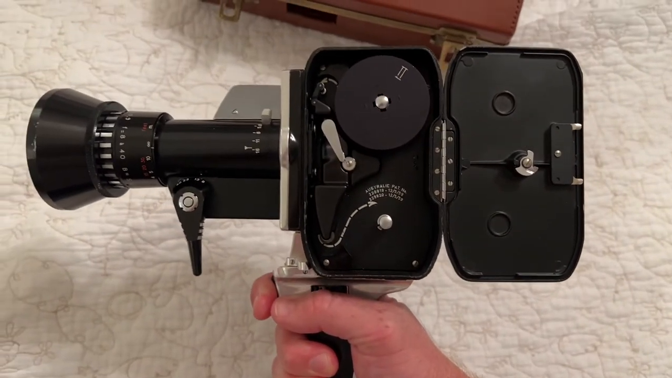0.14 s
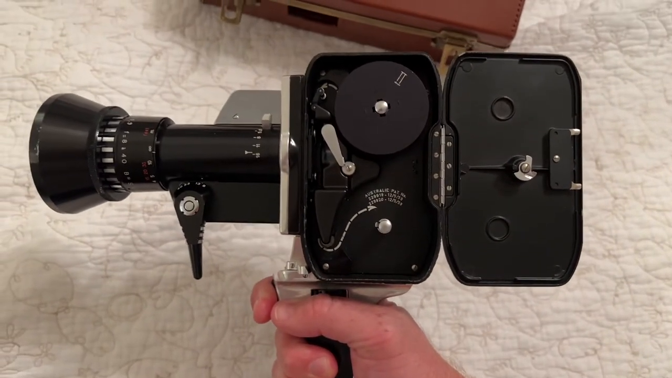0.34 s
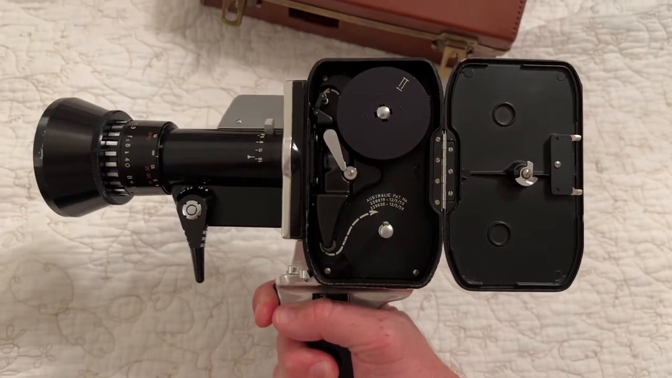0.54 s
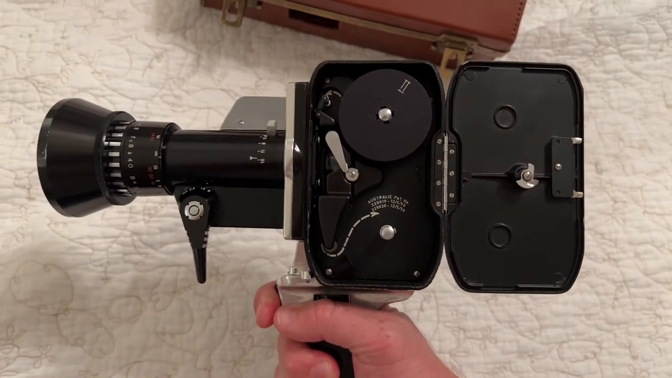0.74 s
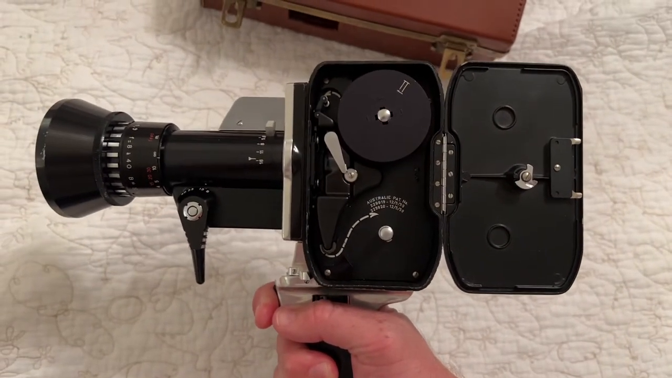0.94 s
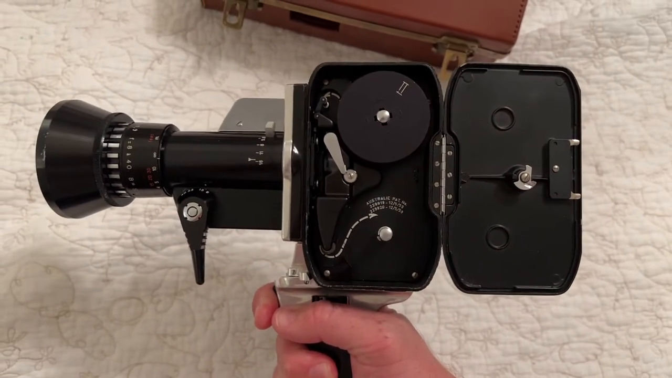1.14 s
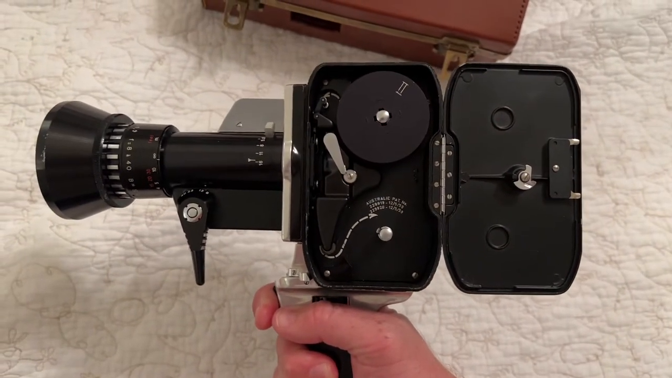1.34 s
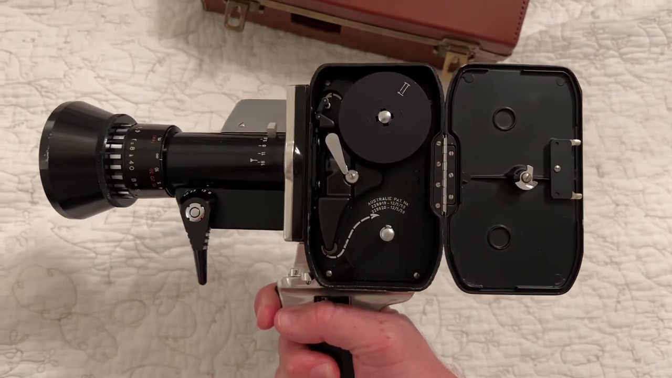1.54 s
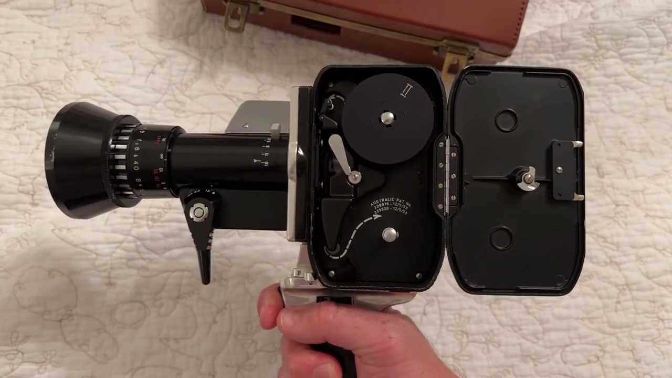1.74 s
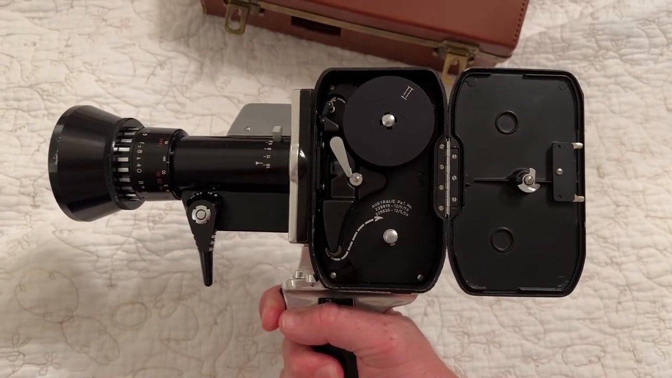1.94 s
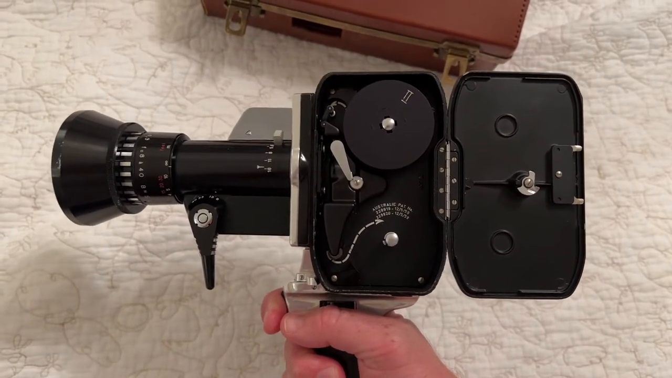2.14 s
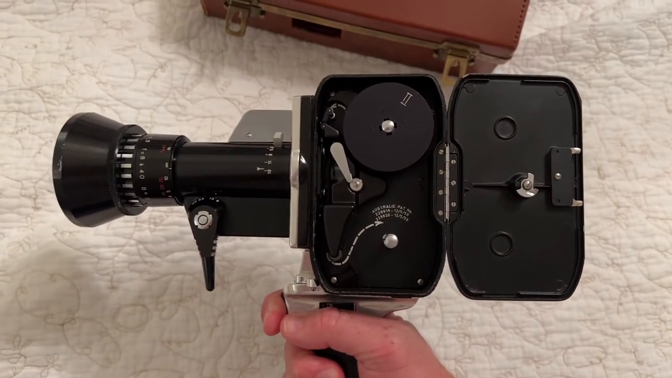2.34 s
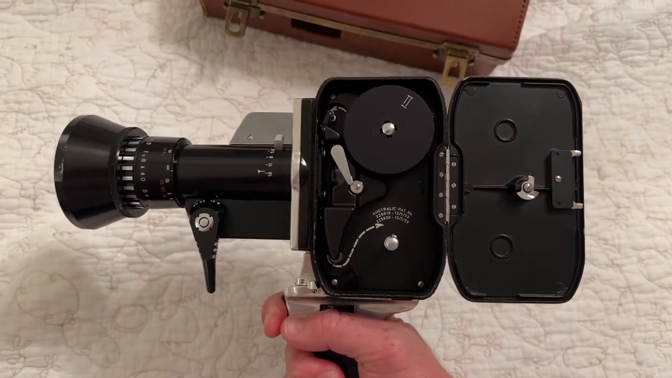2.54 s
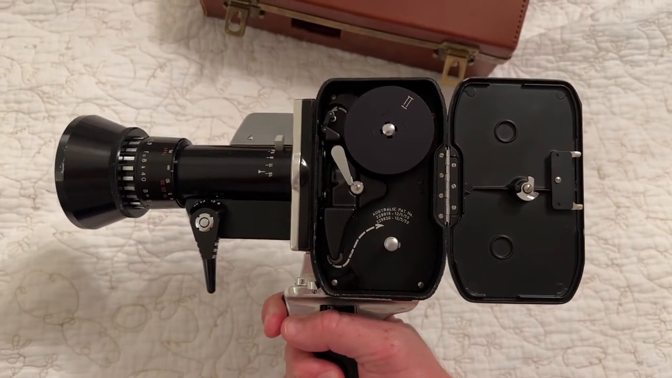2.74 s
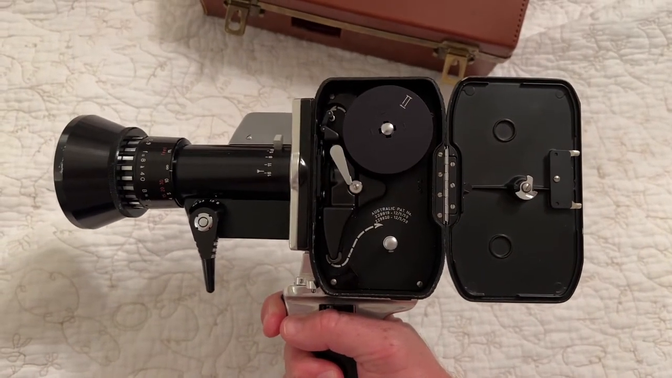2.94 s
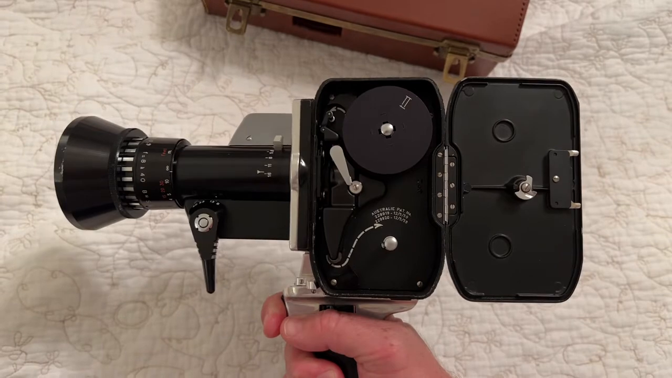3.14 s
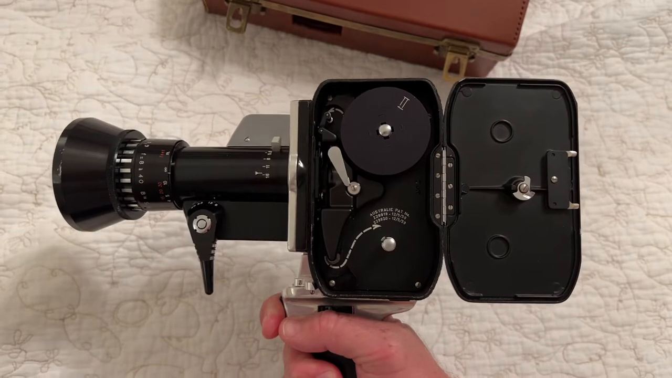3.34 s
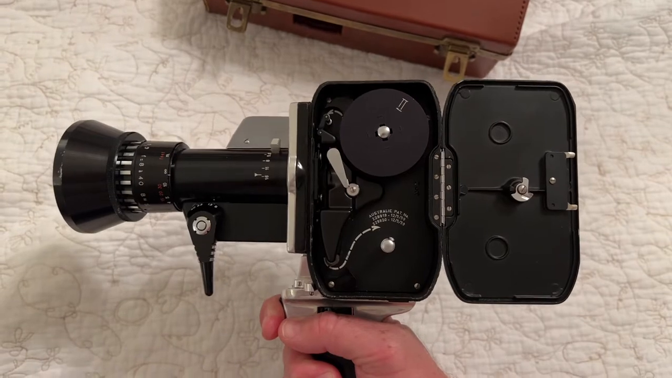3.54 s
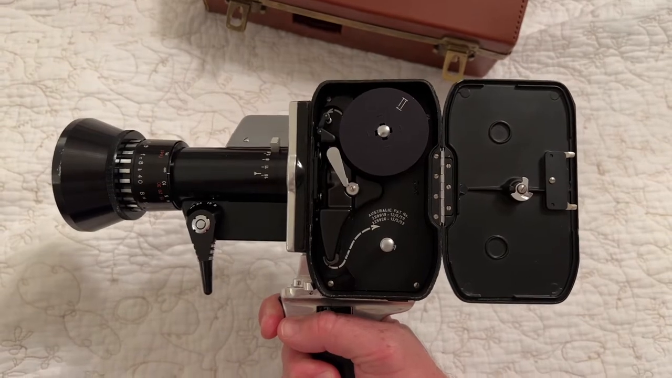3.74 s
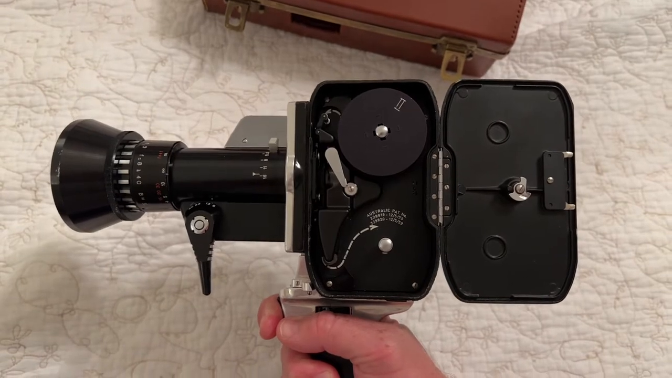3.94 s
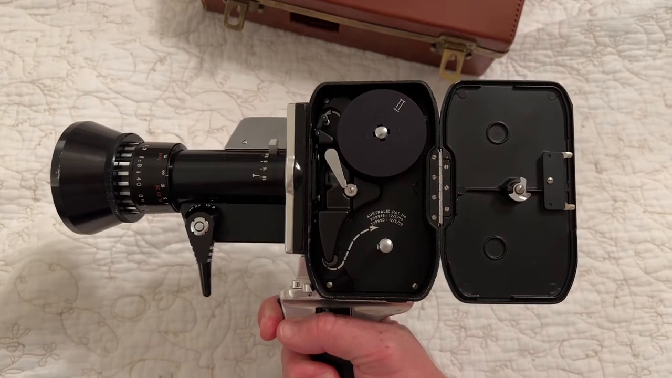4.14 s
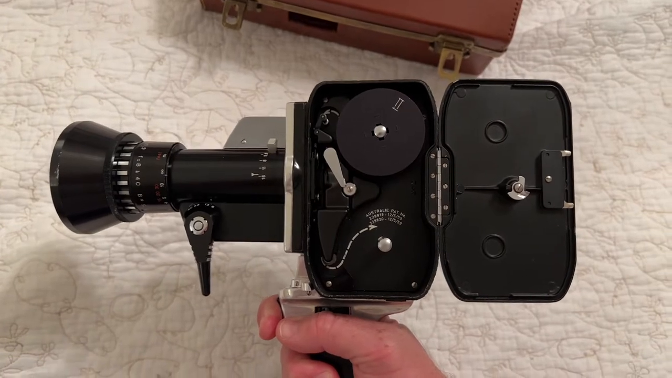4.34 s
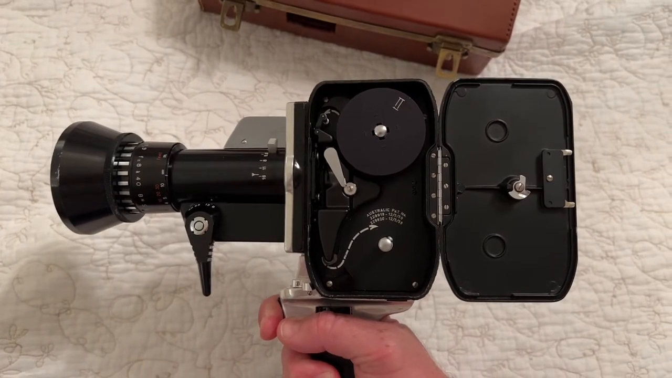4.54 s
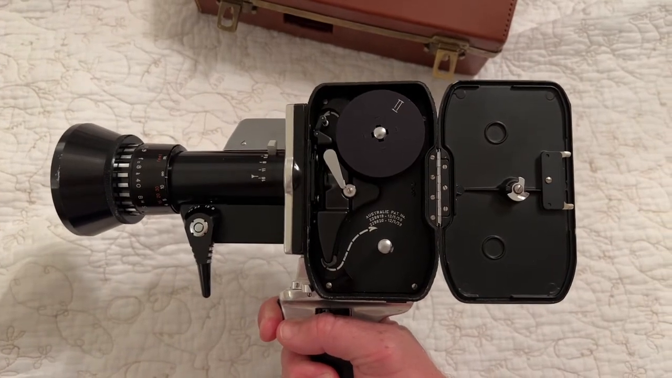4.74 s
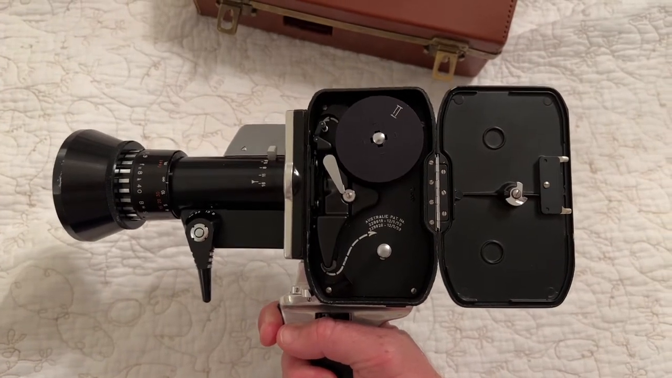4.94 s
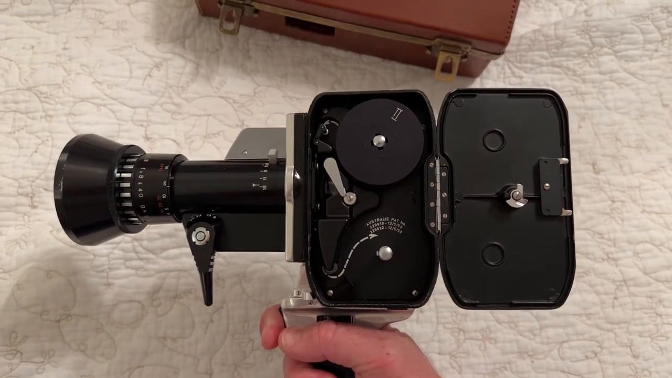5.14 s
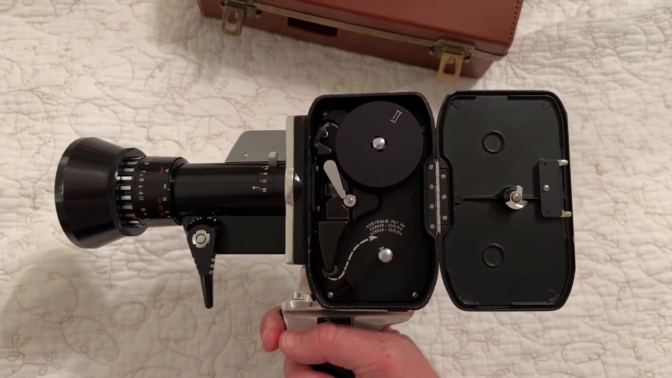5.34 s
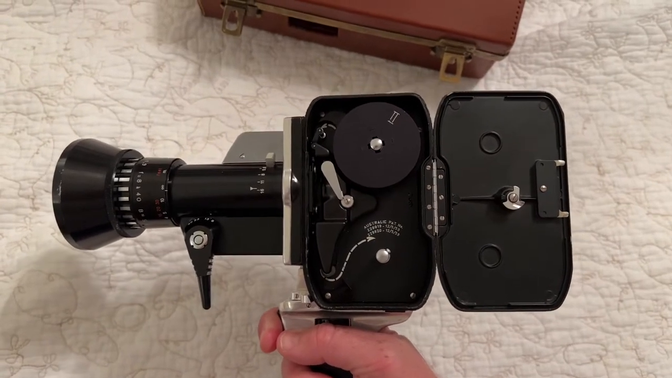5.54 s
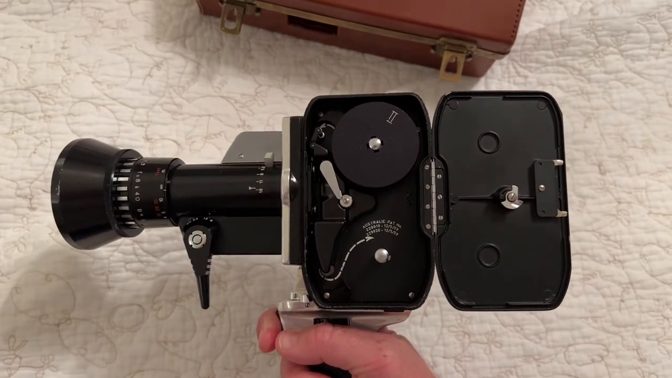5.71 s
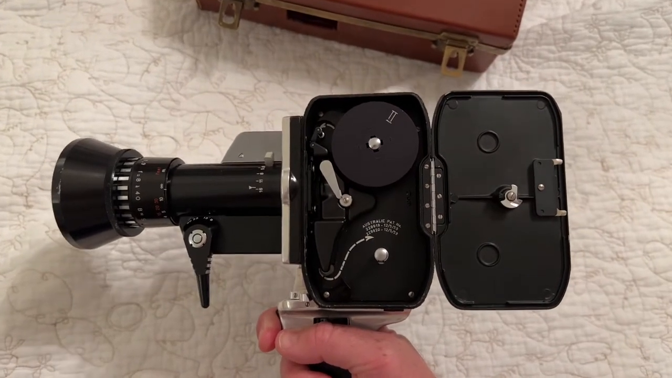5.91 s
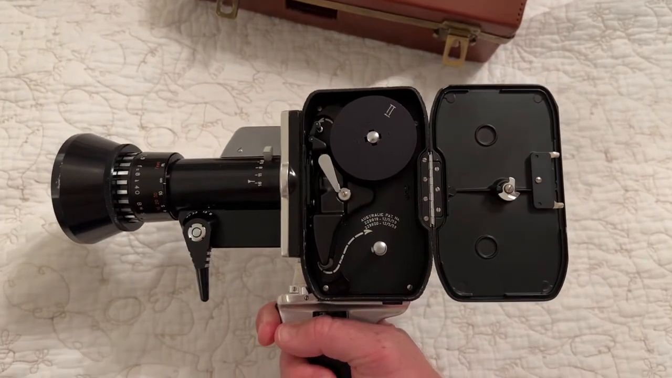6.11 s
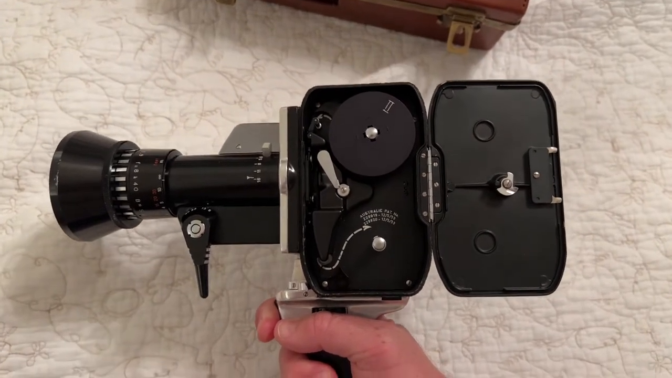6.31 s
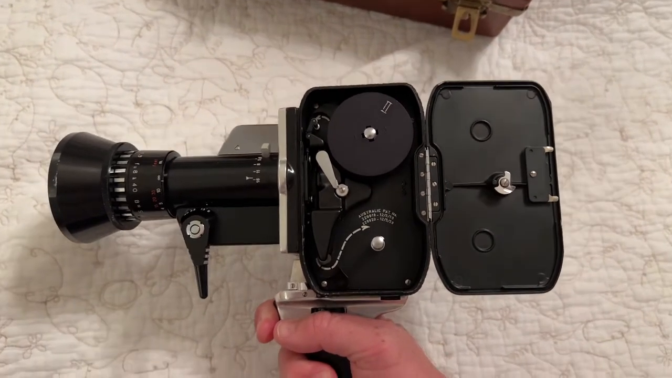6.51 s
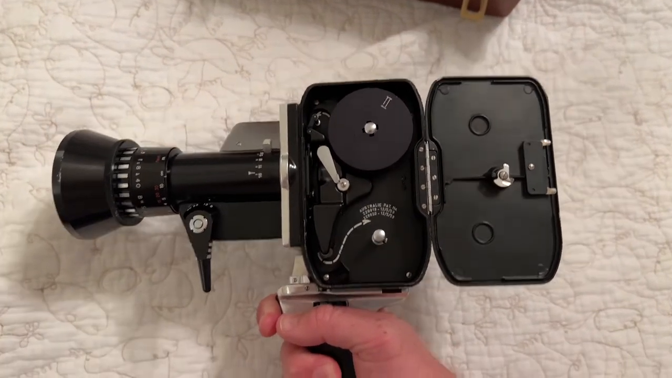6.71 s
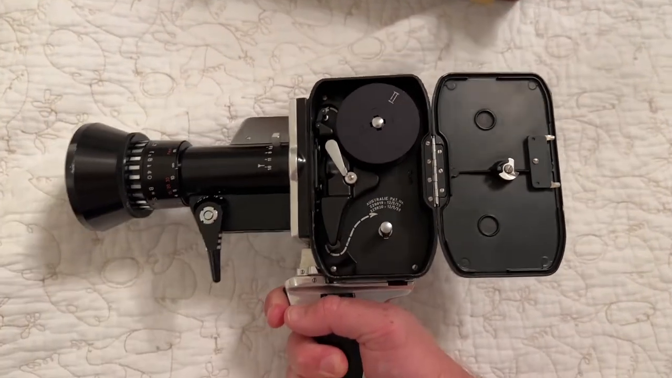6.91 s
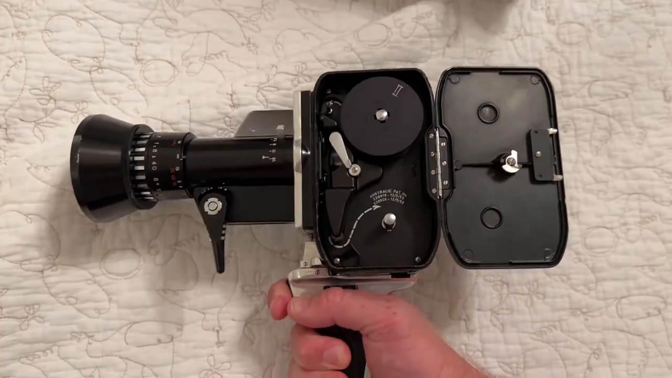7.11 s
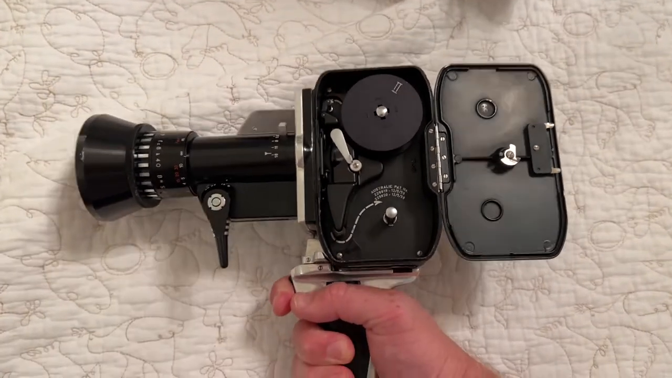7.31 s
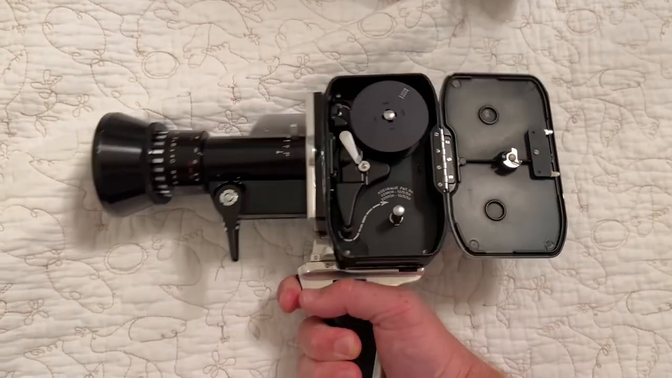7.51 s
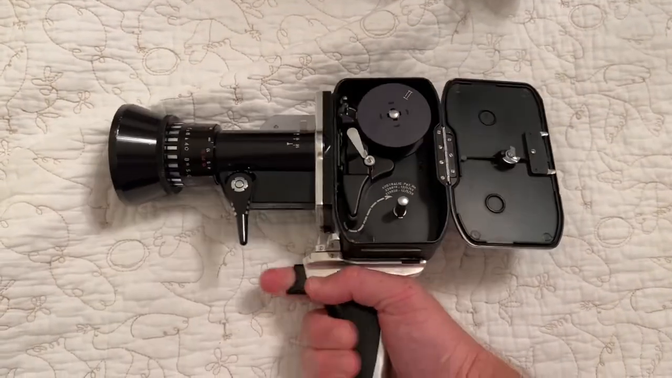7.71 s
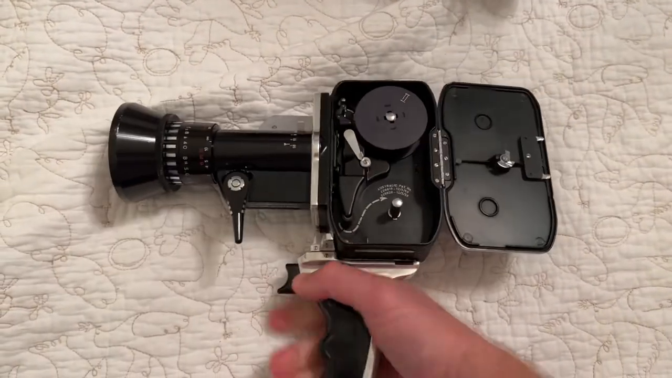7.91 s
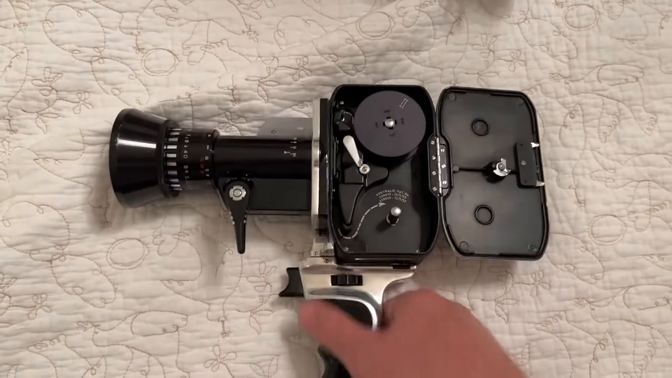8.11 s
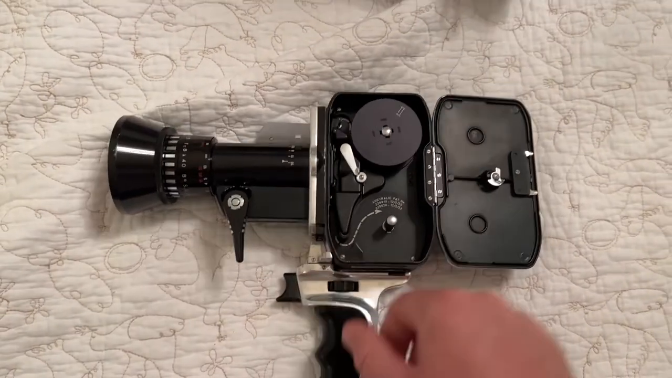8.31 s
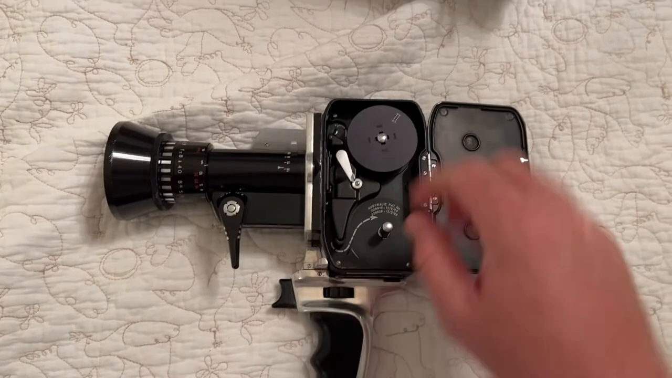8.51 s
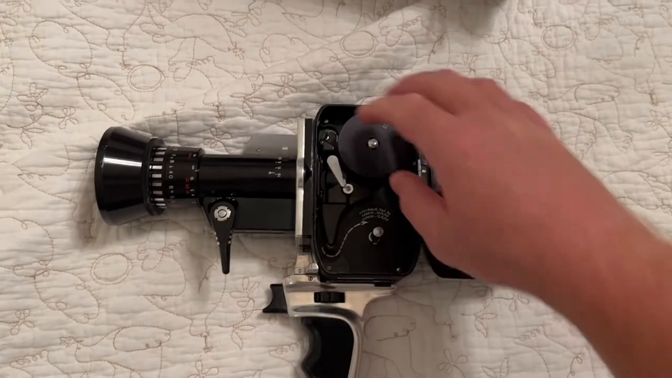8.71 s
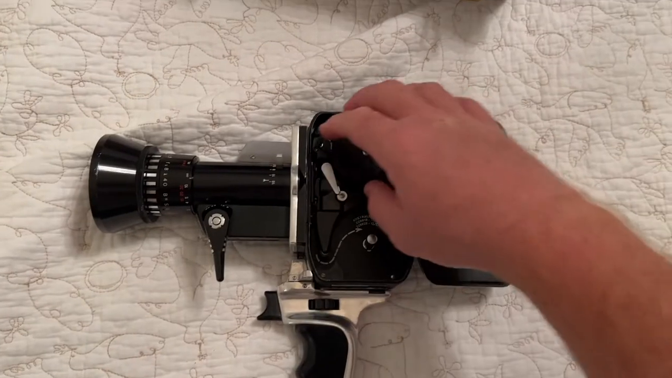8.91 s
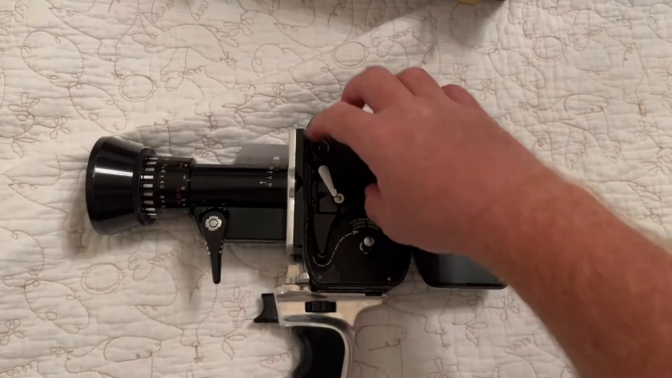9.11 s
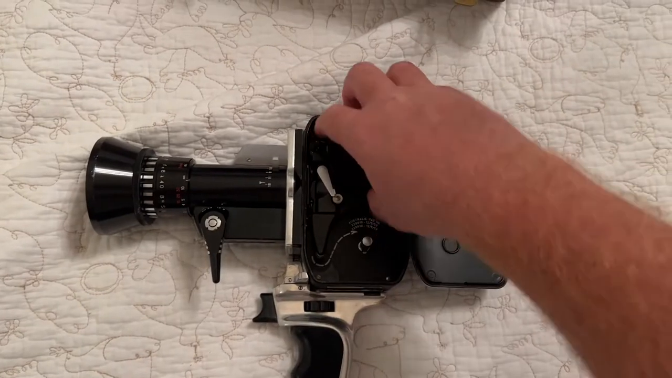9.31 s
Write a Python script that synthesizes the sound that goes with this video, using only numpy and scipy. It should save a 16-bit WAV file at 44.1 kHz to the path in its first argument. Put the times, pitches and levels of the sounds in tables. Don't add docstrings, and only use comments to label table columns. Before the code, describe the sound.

Close, fast mechanical whir of a clockwork film camera ends in a sharp clack; quiet handling, trigger clicks, cloth rub and spool rattle follow.

```python
import sys
import numpy as np
from scipy import signal
from scipy.fft import rfft, irfft
from scipy.io import wavfile
from scipy.ndimage import uniform_filter1d, map_coordinates

SR = 44100
rng = np.random.default_rng(int(sys.argv[2]) if len(sys.argv) > 2 else 0)


def inscribe(sig):
    pcm = np.round(np.clip(np.atleast_2d(sig).T, -1, 1) * 32767)
    wavfile.write(sys.argv[1], SR, pcm.astype(np.int16))


def volts(x):
    e = np.asarray(x, float) / 20
    return 10 ** e


N = 417186
T = np.arange(N) / SR
STOP_S, DRAG_S = 6.89, 9.1

# (frequency [Hz], level [dB per Hz])
BODY = [(220, -47.5), (380, -26), (569, -22), (687, -18), (1000, -4), (1180, -7.5), (1290, -2.5),
        (1890, -10.5), (2100, -8), (3960, -15.5), (5320, -23.5), (7160, -24), (9500, -33.5), (12400, -30),
        (20900, -120)]
# (frequency [Hz], width [Hz], level [dB])
PLATES = [(420, 12, -1), (904, 200, 1), (1031, 86, 3), (1110, 18, 4), (1295, 80, 5.5), (1498, 104, 3.5),
          (1875, 150, 8.5), (2125, 90, -10.5), (3114, 200, 4.5), (4003, 164, 8.5), (4610, 160, 8.5),
          (4986, 64, 11), (5700, 270, 4), (7140, 150, 2), (7570, 160, 7)]


def noise():
    return rng.standard_normal(N)


def tone(turns):
    return np.sin(2 * np.pi * turns)


def wave(turns):
    return np.cos(2 * np.pi * turns)


def rms_one(x):
    return x / np.sqrt(np.mean(x ** 2) + 1e-20)


def in_time(rows):
    s, *columns = np.transpose(rows)
    return [np.interp(T, s, column) for column in columns]


def between(start_s, end_s, fade_s=.006):
    fade_in = np.clip((T - start_s) / fade_s + 1, 0, 1)
    return fade_in * np.clip((end_s - T) / fade_s + 1, 0, 1)


def drift(rate_hz):
    points = rng.standard_normal(int(N / SR * 60) + 2)
    return np.interp(T * rate_hz, np.arange(len(points)), points) * np.sqrt(1.5)


def split(x, hz):
    return [signal.sosfilt(signal.butter(2, hz, side, fs=SR, output="sos"), x) for side in ("low", "high")]


def colour(x, spectrum, bumps=()):
    size = 2 ** 14
    hz = np.arange(size // 2 + 1) * SR / size + 1
    curve_hz, curve_db = np.transpose(spectrum)
    db = np.interp(np.log(hz), np.log(curve_hz), curve_db)
    db = db + sum(top_db / (1 + (2 * (hz - f) / width) ** 2) for f, width, top_db in bumps)
    cepstrum = irfft(np.log(volts(db)))
    cepstrum[1:size // 2] *= 2
    cepstrum[size // 2 + 1:] = 0
    impulse = irfft(np.exp(rfft(cepstrum)))
    return rms_one(signal.oaconvolve(x, impulse)[:N])


def resonances(x, modes):
    out = 0
    for k, (hz, width_hz, db) in enumerate(modes):
        r = np.exp(-np.pi * width_hz / SR)
        poles = [1, -2 * r * np.cos(2 * np.pi * hz / SR), r * r]
        out = out + (-1) ** k * volts(db) * signal.lfilter([1 - r, 0, r - 1], poles, x)
    return rms_one(out)


def air():
    # (frequency [Hz], level [dB per Hz])
    air_spectrum = [(12, -31), (20, -15.5), (44, -2), (116, -8.5), (138, -17.5), (168, -9), (204, -16.5),
                    (285, -12), (319, -17), (472, -24), (558, -31.5), (1610, -25.5), (6360, -33.5),
                    (9950, -41.5), (16000, -47)]
    hum = resonances(noise(), [(110, 9, 0)])
    return volts(-68) * colour(noise(), air_spectrum) + volts(-74.5) * hum


def bedroom(x):
    low_t60_s, high_t60_s, room_db = .4, .32, -24
    t = np.arange(int(.4 * SR)) / SR
    dull = split(rng.standard_normal(len(t)), 9400)[0]
    low, high = split(dull, 2500)
    tail = (low * volts(-60 * t / low_t60_s) + high * volts(-60 * t / high_t60_s)) * (t > .006)
    return volts(room_db) * signal.oaconvolve(x, tail / np.sqrt(np.sum(tail ** 2)))[:N]


def gear_rub(turns, low_db, high_db):
    count, stage = 2400, T / .3
    flaws = rng.standard_normal((24, count))
    place, blend = turns % 1 * (count - 1), np.pi / 2 * (stage % 1)
    older, newer = [map_coordinates(flaws, [stage // 1 + k, place], order=1) for k in (0, 1)]
    repeat = split(np.cos(blend) * older + np.sin(blend) * newer, 1400)[0]

    idler_turns = 2.7 * turns
    load_db = wave(12 * turns) + .49 * wave(11 * turns) + .85 * np.cos(2 * np.pi * turns + 1.4)
    load_db = load_db + .7 * wave(idler_turns) + .6 * drift(25)
    mixed = colour(volts(load_db) * noise(), BODY, PLATES) + .5 * colour(repeat, BODY, PLATES)
    low = signal.sosfiltfilt(signal.butter(4, 1180, fs=SR, output="sos"), mixed)
    return volts(low_db) * low + volts(high_db) * (mixed - low)


def wheel_tones(turns, loose, tilt):
    # (multiple of shaft [1], level [dB], change with tilt [dB])
    wheels = [(27, -77, 2), (50, -67, 2), (51, -66, 0), (54, -60, -4), (55.6, -64, 0), (60, -57, -3),
              (65, -60, 9), (77, -57, -4), (67, -59, 2), (68, -63, 2), (75, -58, -3), (78.25, -59, -4),
              (90.6, -63, 0), (109, -62, 0)]
    looser = 12 * loose - 11 * turns
    out = np.zeros(N)
    for k, db, by_db in wheels:
        level_db = db - 2 + by_db * tilt + 3.2 * drift(2.93)
        out += volts(level_db) * np.sin(2 * np.pi * k * looser + k ** 2)
    return out


def plates_facing(x, sway, tilt):
    # (frequency [Hz], width [Hz], sway [dB], change with tilt [dB])
    facing = [(1000, 82, 2.5, -1), (1060, 120, 1.5, 3), (1300, 130, 2, -2), (2120, 150, 2, 6),
              (2470, 570, 1, 0.5), (4030, 250, 2, -0.5), (4930, 150, 3.5, 1), (7100, 300, 3, 1)]
    for k, (hz, width_hz, sway_db, by_db) in enumerate(facing):
        gain = volts(sway_db * np.roll(sway, k * SR) + by_db * tilt ** 2)
        x = x + (gain - 1) * signal.lfilter(*signal.iirpeak(hz, hz / width_hz, fs=SR), x)
    return x


def mesh_tone(loose):
    # (multiple of shaft [1], level [dB])
    mesh = [(27, -17), (30, -18), (31, -15), (32, -11), (33, -3), (34, 0), (35, -2.5), (36, -9), (37, -14)]
    return rms_one(sum(volts(db + drift(2.5)) * np.sin(2 * np.pi * k * loose + np.pi * min(k - 34, 0))
                       for k, db in mesh))


def tooth_ticks(turns, tilt, tick_db, high_db):
    # (frequency [Hz], width [Hz], level [dB])
    pinion = [(3650, 600, 1), (5860, 660, 2), (7110, 142, 7), (7800, 560, -4), (10930, 170, -11)]
    # (frequency [Hz], width [Hz], level [dB])
    shutter = [(11600, 500, -11), (12250, 800, -11), (13480, 520, 1.5), (14630, 900, -6)]
    shutter_db, claw_db, tap_db = -6.5, -83, -22.5

    at = np.flatnonzero(np.diff(np.floor(12 * turns)))
    chance = np.clip(rng.standard_normal((len(at), 2)), -2, 2)
    turn = turns[at]
    size_db = 2.2 * np.cos(4 * np.pi * turn + 1.2) + 1.7 * np.cos(2 * np.pi * turn + 2.1)
    size_db += 1.3 * wave(3 * turn) + wave(5.65 * turn)
    size_db += .7 * chance[:, 0] + 2.4 * uniform_filter1d(chance[::-1, 1], size=4)
    at = at + np.abs(6 * chance[:, 1]).astype(int)
    hits = np.zeros(N)
    hits[at] = volts(size_db)
    chatter = signal.lfilter([.09], [1, -1.88, .8835], hits)
    hits[at] *= volts(2.9 * chance[::-1, 0])
    flutter = signal.lfilter([1], [1, -.95], hits) + .1 * (1 + wave(23 * turns))

    rattle = noise()
    ticks = volts(tick_db) * resonances((chatter + .059) * rattle, pinion)
    ticks += volts(tick_db + shutter_db - 1.5 * tilt) * resonances((flutter + .04) * noise(), shutter)
    claw_swing_db = 12 * np.cos(2 * np.pi * turns + 3.5)
    ticks += volts(claw_db + claw_swing_db) * resonances(rattle[::-1], [(9800, 490, 0)])
    taps = split(colour(chatter * rattle, BODY, PLATES), 1420)[1]
    return ticks + volts(high_db + tap_db) * rms_one(taps)


def train():
    # (time [s], shaft speed [turns/s])
    speed = [(0.0, 16.953), (0.5, 16.938), (1.0, 16.911), (1.5, 16.88), (2.0, 16.855), (2.5, 16.836),
             (3.0, 16.821), (3.5, 16.807), (4.0, 16.787), (4.5, 16.752), (5.0, 16.698), (5.5, 16.624),
             (6.0, 16.535), (6.5, 16.446), (6.85, 16.4)]
    play_turns = .002
    turns = np.cumsum(in_time(speed)[0]) / SR + .024
    loose = turns + play_turns * drift(1.5)
    sway = (loose - turns) / play_turns
    tilt = np.interp(T, (5.16, 6.16), [0, 1])

    low_db, high_db = -44 + .3 * tilt, -45.5 - tilt
    tick_db, mesh_db = -57.5 + .7 * tilt, -64 - 4.5 * tilt
    barrel_s, slack_s, barrel_db = 2.91, .1, 2.5
    mesh_db = mesh_db - barrel_db * wave((T - slack_s) / barrel_s)

    rub = gear_rub(turns, low_db, high_db) + wheel_tones(turns, loose, tilt)
    rub = plates_facing(rub, sway, tilt)
    ticks = tooth_ticks(turns, tilt, tick_db, high_db)
    running = (rub + volts(mesh_db) * mesh_tone(loose)) * between(0, STOP_S)
    return running + ticks * between(0, STOP_S - .022)


def governor():
    whine_s, coast_s, end_s = 6.62, 6.9, 7.15
    coast_hz, whine_sag_hz_per_s, sag_hz_per_s, brake_hz_per_s3 = 14480, 1500, 4000, 250000
    whine_db, coast_db, fade_from_s, fade_db_per_s = -80, -83, 7.06, 150
    t = np.clip(T - coast_s, 0, end_s - coast_s)
    hz = coast_hz + whine_sag_hz_per_s * np.clip(coast_s - T, 0, 1)
    hz = hz - sag_hz_per_s * t - brake_hz_per_s3 * t ** 3
    db = np.where(t > 0, coast_db, whine_db) - fade_db_per_s * np.clip(T - fade_from_s, 0, 1)
    return volts(db + 3 * drift(60)) * tone(np.cumsum(hz) / SR) * between(whine_s, end_s)


def knock(peak_db, body_db, treble_db, body_hz, ring_hz, ring_db, contact_s):
    # (frequency [Hz], level [dB], t60 [s])
    thin_parts = [(2800, -4, .006), (3500, -4, .006), (4300, -3, .006), (5300, -18, .025), (6000, -4, .005),
                  (7300, -4, .004), (10400, -8, .004), (12200, -8, .008), (14500, -4, .003)]
    # (multiple of body pitch [1], level [dB], t60 [s])
    hollow_modes = [(.36, -30, .02), (.78, -13, .01), (1, 0, .017), (1.27, -6, .01), (1.5, -8, .008)]
    t = np.arange(3000) / SR
    u = t / contact_s
    push = u ** 2 * np.exp(-1.3 * u) + .17 * np.minimum(u / 2, 1) * np.exp(-t / .0036)
    force = rng.standard_normal(len(t)) * push

    struck = [(ring_hz, ring_db - 3, .003), (.9 * ring_hz, ring_db - 5, .003)]
    hz, db, t60_s = np.transpose(thin_parts + struck)[:, :, None]
    detune = 1 + .019 * rng.standard_normal(hz.shape)
    parts = volts(db - 60 * t / t60_s) * tone(hz * detune * t)
    rung = signal.fftconvolve(force, parts.sum(axis=0))[:len(t)] + volts(22) * force
    middle, treble = split(split(rung, 2200)[1], 7000)
    middle, treble = split(middle, 7000)[0], split(treble, 7000)[1]

    ratio, db, t60_s = np.transpose(hollow_modes)[:, :, None]
    hollow = volts(db - 60 * t / t60_s) * tone(body_hz * ratio * t)
    body = signal.fftconvolve(force, hollow.sum(axis=0))[:len(t)]
    body = split(split(body, .64 * body_hz)[1], .55 * body_hz)[1]

    middle, treble, body = [volts(peak_db) * x / np.abs(x).max() for x in (middle, treble, body)]
    return middle, volts(treble_db) * treble + volts(body_db) * body


def shade(x):
    shades = [
        (6.8, [(3200, 600, -2), (4500, 1200, 3), (7560, 1400, 6), (12000, 1200, 3.5), (15000, 3500, -10)]),
        (7.5, [(2200, 600, -2), (4600, 920, -5), (6330, 820, 2), (11200, 920, 3), (14800, 1500, 4)]),
        (8.9, [(450, 200, 14), (760, 330, -22), (1770, 170, -0.5), (2700, 650, -2.5), (4500, 770, 5), (7540, 2300, -6.5), (12400, 500, 7.5), (14300, 1500, 3)]),
    ]
    edges = [int(s * SR) for s, _ in shades] + [N]
    for (_, bands), start, end in zip(shades, edges, edges[1:]):
        for hz, width_hz, db in bands:
            r = np.exp(-np.pi * width_hz / SR)
            poles = [2, -4 * r * np.cos(2 * np.pi * hz / SR), 2 * r ** 2]
            band = signal.lfilter([1 - r ** 2, 0, r ** 2 - 1], poles, x[start:end])
            x[start:end] += (volts(db) - 1) * band
    return x


def knocks():
    # (time [s], peak [dB], body [dB], treble [dB], body pitch [Hz])
    camera_snaps = [(6.8668, -29.5, -12, 4, 1050), (6.8693, -33, -1, -4, 1060),
                    (6.874, -22.5, -7, -13, 1300), (6.875, -35, -6, -5, 1300), (6.881, -41, 9, -1, 1190),
                    (6.895, -41, -12, -6, 1750), (6.9035, -56, -10, -3, 1500),
                    (6.9608, -48.5, -8, -6, 1260), (6.9918, -55, 5, -20, 1700),
                    (7.0006, -50.5, -2, -6, 1830), (7.0121, -57, -2, -3, 1750), (7.56, -55, -11, -8, 1960),
                    (7.5936, -37.5, -26, -18, 2280), (7.5959, -31.5, -25, -8, 2250),
                    (7.605, -32.5, -14, -13, 1050), (7.6786, -53, -12, -6, 2190),
                    (7.687, -32, -13, -5, 1950), (7.7002, -61, -7, 4, 1550), (7.718, -34.5, -26, -2, 1900),
                    (7.7221, -34, -9, -11, 1450)]
    # (time [s], peak [dB], body [dB], body pitch [Hz], flange pitch [Hz])
    spool_snaps = [(9.061, -62, 6, 1450, 2990), (9.1153, -30, -2, 2060, 2840),
                   (9.1607, -16.5, -1.5, 1523, 4640), (9.1658, -35, 6.5, 1480, 3100),
                   (9.174, -35, -10, 1500, 2590), (9.218, -42.5, 1.5, 1240, 4280),
                   (9.242, -42.5, -9, 1600, 4300), (9.268, -47, 11.5, 1660, 4420),
                   (9.3208, -38.5, 1, 1510, 4430), (9.3424, -33.5, -9, 1380, 4020),
                   (9.383, -58, 19, 1500, 2780), (9.3904, -58, 18, 1530, 2830),
                   (9.4134, -32, -11, 1650, 4650), (9.4148, -30.5, -1.5, 1650, 3740)]
    # (time [s], peak [dB], body [dB], treble [dB], body pitch [Hz])
    nudges = [(6.8887, -44, 14, -15, 950), (7.62, -47, -4, -9, 1390), (7.6225, -52, 1, -5, 1310),
              (8.2347, -53, 5, -15, 1450), (8.2539, -64, 5, -14, 1270), (9.0535, -59.5, 1, -19, 1700),
              (9.1102, -53, 6, -17, 1500), (9.1579, -31, -3, -12, 1620), (9.222, -45, 7, 3, 1310),
              (9.2455, -47, 8.5, -7, 1500), (9.256, -56, 8, -15, 1500), (9.26, -56, 13, -15, 1300),
              (9.2705, -52, 9, -24, 1400), (9.324, -41, 6, -4, 1090), (9.3285, -54, 5, -8, 1150),
              (9.3385, -56, 14.5, -15, 1300), (9.346, -57, -1, -19, 1300), (9.387, -58, 6, -12, 1500),
              (9.411, -53, 17, -15, 1600), (9.4352, -56, 17, -15, 1250), (9.4427, -56, 14, -12, 1085),
              (9.451, -57, 10, -9, 1080), (9.457, -57, 11, -9, 1080)]
    pawl_hz, latch_hz, latch_s, rim_hz = 4700, 5600, 7.6, 4100
    part_db, flange_db, spool_treble_db = 2.5, 11.5, -6
    snap_s, nudge_s = .0005, .0011

    hits = [(*row, latch_hz if row[0] > latch_s else pawl_hz, part_db, snap_s) for row in camera_snaps]
    for s, db, body_db, hz, ring_hz in spool_snaps:
        treble_db = spool_treble_db - max(body_db, 0)
        hits.append((s, db, body_db, treble_db, hz, ring_hz, flange_db, snap_s))
    hits += [(*row, rim_hz, part_db, nudge_s) for row in nudges]

    out = np.zeros(N + 3000)
    for s, *settings in hits:
        middle, rest = knock(*settings)
        start = round(s * SR) - np.abs(middle).argmax()
        out[start:start + 3000] += middle + rest
    out += 1e-12 * rng.standard_normal(len(out))
    return shade(out)[:N]


def cloth():
    # (start [s], top [s], end [s], rub level [dB], thud re rub [dB])
    strokes = [
        (6.892, 6.9, 7.27, -74, 8),
        (7.47, 7.97, 8.24, -58.5, -10.5),
        (8.95, 9.09, 9.11, -82, 7),
    ]
    # (frequency [Hz], level [dB per Hz])
    cloth_spectrum = [(410, -41), (700, -10), (1290, -0.5), (3120, -1.5), (4080, -6.5), (4740, -8.5),
                      (7920, -21), (9000, -21), (11700, -59), (19800, -120)]
    rest_thud_db, rest_rub_db, rest_fine_db, fine_db = -78, -84.5, -87, -17
    rub, low_rub = np.zeros(N), np.zeros(N)
    for start_s, top_s, end_s, db, thud_db in strokes:
        rise_fall = np.interp(T, [start_s, top_s, end_s], [0, 1, 0])
        swell = volts(db) * rise_fall ** np.where(T > top_s, .72, 1)
        rub += swell
        low_rub += volts(thud_db) * swell
    thud = resonances(noise(), [(377, 260, 11.5), (750, 1400, -.5)])
    fine = rms_one(split(noise(), 7000)[1])
    out = (volts(rest_thud_db) + low_rub * volts(.68 * drift(20))) * thud
    out += (volts(rest_rub_db) + rub * volts(2.1 * drift(45))) * colour(noise(), cloth_spectrum)
    out += (volts(rest_fine_db) + volts(fine_db) * rub) * fine
    return out * between(STOP_S, DRAG_S)


def trigger():
    # (time [s], lever squeal [dB], spring squeal [dB])
    slide = [(6.9, -105, -105), (7.18, -105, -100), (7.22, -100, -87), (7.27, -92, -95), (7.32, -80, -90),
             (7.4, -88, -83), (7.47, -80, -77), (7.54, -74, -74), (7.59, -74, -80)]
    # (frequency [Hz], width [Hz], level [dB])
    lever = [(1850, 60, 0), (4200, 45, -1)]
    # (frequency [Hz], width [Hz], level [dB])
    spring = [(7550, 22, 0), (11650, 40, -12), (14450, 50, -24)]
    # (frequency [Hz], width [Hz], level [dB], loss [dB/s])
    stop_ring = [(1800, 110, -68, 75), (2800, 120, -75, 90), (3000, 2500, -61, 330), (4200, 45, -66, 190),
                 (7550, 30, -79, 110)]
    rough_db = -4
    lever_db, spring_db = in_time(slide)
    since_s = np.clip(T - slide[0][0], 0, 1)
    friction = volts(1.5 * drift(40)) * noise()
    out = np.zeros(N)
    for hz, width_hz, db, loss in stop_ring:
        out += volts(db - loss * since_s) * resonances(friction, [(hz, width_hz, 0)])
    for level_db, modes, rate_hz in ((lever_db, lever, 25), (spring_db, spring, 40)):
        pure = sum(volts(db) * tone(hz * T) for hz, _, db in modes)
        squeal = volts(rough_db) * resonances(friction, modes) + pure
        out += volts(level_db - 1 + 2.5 * drift(rate_hz)) * squeal
    return out * between(slide[0][0], slide[-1][0])


def after_rings():
    # (time [s], frequency [Hz], level [dB], t60 [s])
    rings = [(7.688, 5250, -58, .08), (7.72, 10600, -63, .08), (7.724, 1380, -49, .06),
             (9.2435, 12300, -56, .04), (9.321, 12300, -57, .05), (9.325, 1080, -47, .07),
             (9.163, 1530, -33, .05), (9.117, 1900, -50, .1)]
    return sum(volts(db - 60 * np.clip(T - s, 0, 1) / t60_s) * tone(hz * (T - s)) * (T > s)
               for s, hz, db, t60_s in rings)


def touches():
    # (time [s], length [s], frequency [Hz], width [Hz], level [dB])
    skin = [
        (8.88, .04, 3400, 500, -71),
        (8.405, .04, 12500, 6000, -80),
    ]
    out = np.zeros(N)
    for s, length_s, hz, width_hz, db in skin:
        mode = [(hz, width_hz, 0)]
        out += volts(db) * resonances(resonances(noise(), mode), mode) * between(s, s + length_s)
    return out


def spool_drag():
    # (time [s], level [dB])
    drag = [(9.1, -62), (9.125, -53), (9.15, -48.5), (9.18, -47), (9.21, -46), (9.27, -52), (9.29, -50.5),
            (9.36, -55), (9.41, -48), (9.435, -44.5), (9.46, -49)]
    # (frequency [Hz], level [dB per Hz])
    spool_spectrum = [(150, -62), (250, -9), (729, -5), (1200, -12), (1760, -11), (2400, -7), (3110, -1),
                      (4500, -11), (8770, -36), (12000, -31), (15500, -26)]
    bumps = [(700, 450, -10), (1300, 300, 4), (2000, 400, 4), (4400, 1600, 3), (12000, 900, 8)]
    grains = noise() * volts(2.5 * drift(55))
    low, high = split(colour(grains, spool_spectrum, bumps), 2700)
    drag_db, = in_time(drag)
    return volts(drag_db) * (low + volts(-7) * rms_one(high)) * between(DRAG_S, 10)


def scene():
    near = train() + governor() + knocks() + cloth() + trigger() + after_rings() + touches() + spool_drag()
    return (near + bedroom(near) + air())[None]


def low_pass(x):
    return signal.sosfilt(signal.butter(12, 16510, fs=SR, output="sos"), x)


def record(dry):
    rounded = .3 * np.tanh(dry / .3)
    mix = signal.sosfilt(signal.cheby2(18, 60, 16500, fs=SR, output="sos"), rounded)
    return low_pass(mix)


dry = scene()
out = record(dry)
inscribe(out)
```